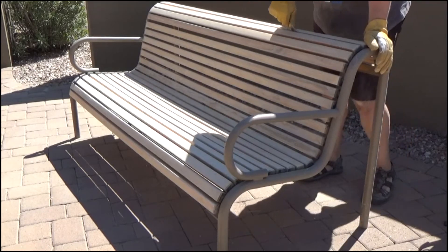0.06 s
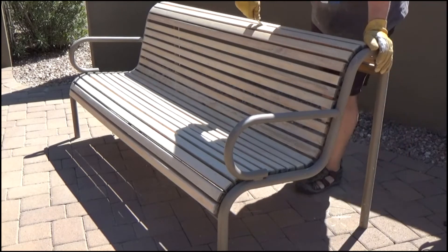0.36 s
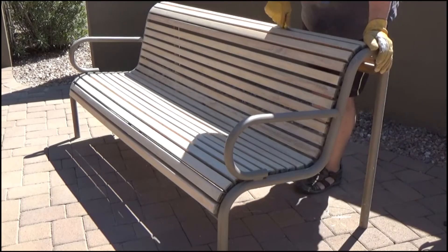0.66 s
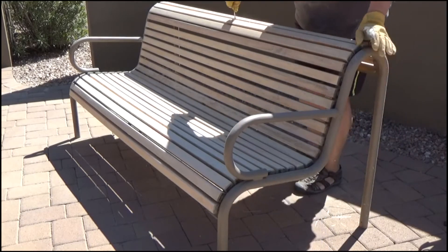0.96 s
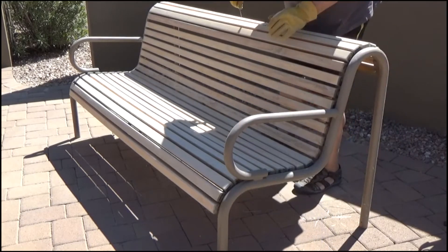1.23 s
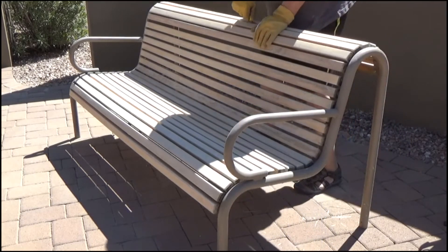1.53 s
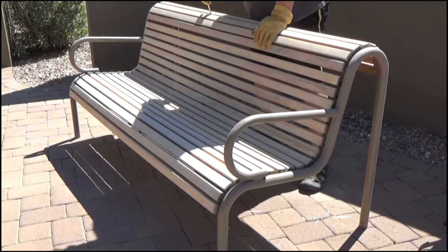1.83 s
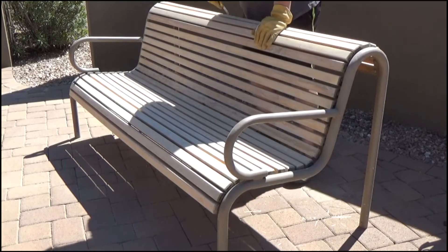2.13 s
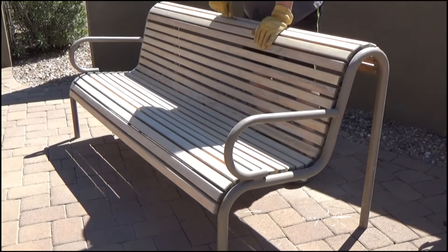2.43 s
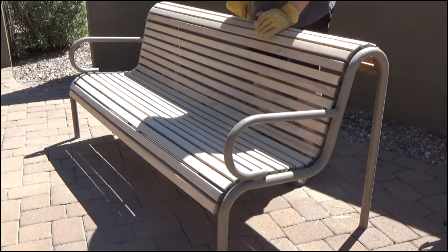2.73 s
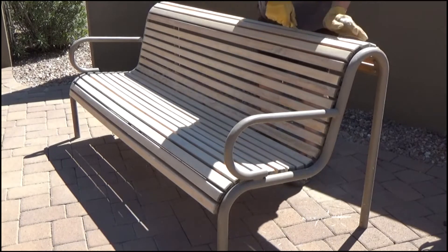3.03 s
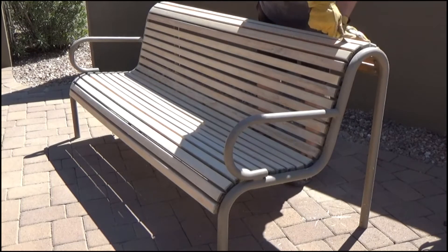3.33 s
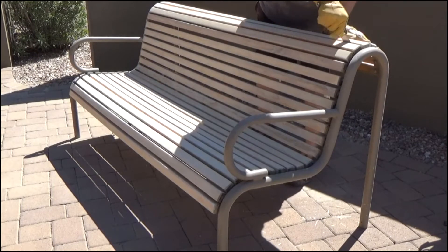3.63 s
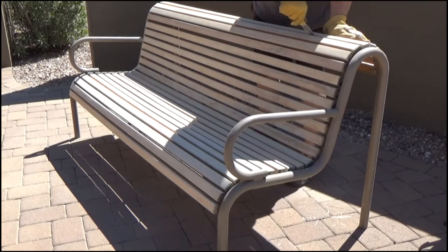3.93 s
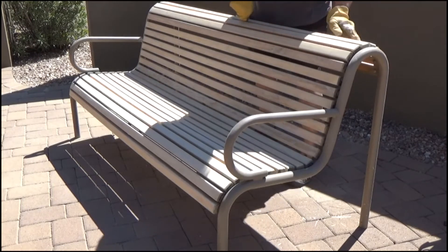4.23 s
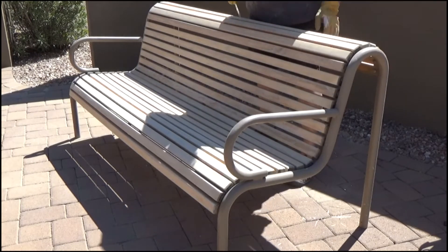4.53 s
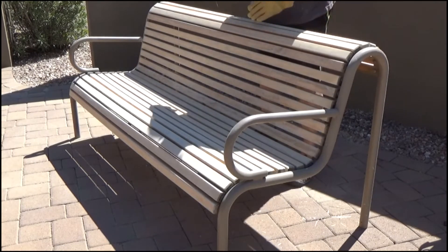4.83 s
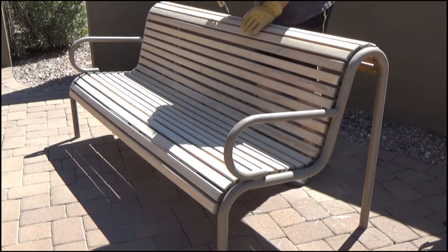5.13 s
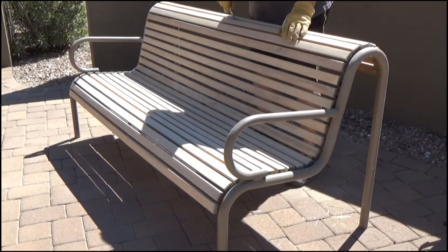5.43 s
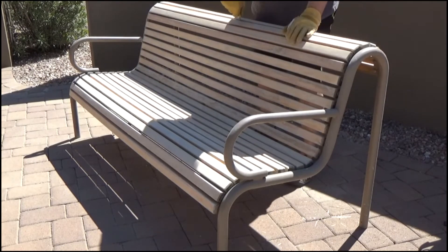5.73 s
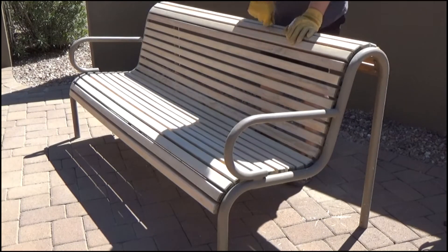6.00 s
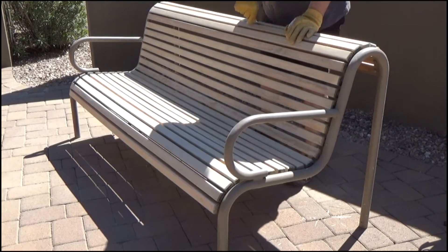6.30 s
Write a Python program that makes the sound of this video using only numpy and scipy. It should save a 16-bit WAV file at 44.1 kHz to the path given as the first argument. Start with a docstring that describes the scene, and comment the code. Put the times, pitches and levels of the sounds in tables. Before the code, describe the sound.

Steel scrapes old finish from a wooden bench in irregular strokes, knocking against the slats and occasionally ringing in quiet outdoor air.

```python
"""A walled patio, the microphone a few steps from a wooden bench. A steel scraper is pushed and pulled
along the gaps between the slats. Its edge rasps through old finish, squeaks on the slats' resonances,
knocks into the wood at the ends of strokes, rings when lifted clear and once clinks under pressure.
The bench takes a few dull bumps. Paving and wall throw the work back.
Behind it: quiet outdoor air, a mains hum and a faint, far trill."""
import sys
import numpy as np
from scipy import signal
from scipy.fft import rfft, irfft
from scipy.io import wavfile
from scipy.ndimage import map_coordinates

SR = 44100
rng = np.random.default_rng(int(sys.argv[2]) if len(sys.argv) > 2 else 0)


def to_wav(sig):
    """Store sig (one row per channel, or 1-D mono) as 16-bit WAV at the path in sys.argv[1].

    Samples outside -1..1 are clipped; the rate is SR.
    """
    pcm = np.clip(np.atleast_2d(sig), -1, 1) * 32767
    pcm = np.round(pcm).astype(np.int16)
    wavfile.write(sys.argv[1], SR, pcm.T)  # frames by channels


N = 284886
TIME = np.arange(N) / SR


def from_db(db):
    """Decibels to gain."""
    return 10 ** (np.asarray(db) / 20)


def rms_one(x):
    """Scale to rms 1."""
    return x / np.sqrt(np.mean(x ** 2) + 1e-20)


def dying(age, t60):
    """Gain that falls 60 dB in t60 seconds."""
    return from_db(-60 * age / t60)


def at_hz(spectrum, hz):
    """Read a spectrum's level in dB on a log-frequency axis."""
    f, db = np.transpose(spectrum)
    return np.interp(np.log(hz + 1e-9), np.log(f), db)


def drift(rate):
    """Random wander of spread 1, heading for a new value rate times a second."""
    knots = rng.standard_normal(N // 16)
    return np.interp(TIME * rate, np.arange(len(knots)), knots) * np.sqrt(3 / 2)


def butter(x, order, hz, kind):
    """Butterworth low-, band- or high-pass."""
    return signal.sosfilt(signal.butter(order, hz, kind, fs=SR, output="sos"), x)


def three_bands(x):
    """Split into wood body, rasp and edge hiss."""
    return [butter(x, 3, 1700, "low"), butter(x, 3, [1700, 6500], "band"), butter(x, 3, 6500, "high")]


def resonate(x, hz, width_hz):
    """One resonance with gain 1 at its peak."""
    r = np.exp(-np.pi * width_hz / SR)
    feedback = [1, -2 * r * np.cos(2 * np.pi * hz / SR), r * r]
    return signal.lfilter(np.array([1, 0, -1]) * (1 - r * r) / 2, feedback, x + 1e-18)


def coloured(x, spectrum, size=4096):
    """Causal (minimum-phase) filter with the given spectrum; white noise keeps its power."""
    gain = rms_one(from_db(at_hz(spectrum, np.arange(size // 2 + 1) * SR / size)))
    cepstrum = irfft(np.log(gain))
    cepstrum[1:size // 2] *= 2
    cepstrum[size // 2 + 1:] = 0
    return signal.fftconvolve(x, irfft(np.exp(rfft(cepstrum))))[:len(x)]


def widened(side, width):
    """Bring a stereo side signal to the given level at each frequency."""
    gain = from_db(at_hz(width, np.linspace(0, SR / 2, SR // 2)))
    return coloured(side, width) * np.sqrt(np.mean(gain ** 2))


# Spectrum of the open air around the microphone: f/Hz, level/dB
AIR_SPECTRUM = [(12, -52), (20, -6), (65, 4.5), (607, -1), (873, -2), (1610, -11.5), (2670, -10.5),
                (3160, -12), (3440, -11), (4060, -16), (7950, -15.5), (14700, -24), (16000, -17)]
# Its stereo width: f/Hz, side re mid/dB
AIR_SIDE = [(60, -30), (150, -15), (380, -8), (950, -3), (2380, -3), (5980, -6.5), (15000, -24)]
def outdoor_air(level_db=-55.5):
    """Steady, quiet air: central in the bass, wide in the middle range."""
    mid, side = [coloured(rng.standard_normal(N), AIR_SPECTRUM) for _ in range(2)]
    return from_db(level_db) * (mid + widened(side, AIR_SIDE) * [[1], [-1]])


# Harmonics of the hum in the background: f/Hz, rms level/dB
HUM_PARTIALS = [(60, -65), (120, -74), (180, -76)]
def mains_hum():
    """The mains hums on three low, steady tones."""
    return sum(from_db(db) * np.sqrt(2) * np.sin(2 * np.pi * hz * TIME) for hz, db in HUM_PARTIALS)


def far_trill(level_db=-70.5, hz=3450, pulses_per_s=30, uneven_db=3):
    """Far from the microphone: short pulses of one tone, uneven in strength."""
    pulses = np.sin(np.pi * pulses_per_s * TIME) ** 20 * from_db(uneven_db * drift(pulses_per_s))
    return from_db(level_db) * rms_one(pulses * np.sin(2 * np.pi * hz * TIME))


# Stereo width of the patio's echoes at the microphone: f/Hz, side re direct/dB
ECHO_SIDE = [(40, -27), (120, -43), (300, -17), (1000, -13.5), (2500, -15.5), (5000, -9.5), (8000, -21),
             (14000, -55)]
def patio(direct, echo_db=-8.0, early_t60=0.012, tail_db=-8.0, tail_t60=0.27):
    """Paving and wall answer at once; a thin scattered tail follows. The echoes carry the width."""
    age = TIME[:SR // 2]
    decay = rms_one(dying(age, early_t60)) + from_db(tail_db) * rms_one(dying(age, tail_t60))
    decay *= age > .002   # the first echo arrives after 2 ms
    mid, side = [rms_one(rng.standard_normal(len(age)) * decay) / np.sqrt(len(age)) for _ in range(2)]
    mid_echo = from_db(echo_db) * signal.fftconvolve(direct, mid)[:N]
    side_echo = signal.fftconvolve(direct, widened(side, ECHO_SIDE))[:N]
    return direct + mid_echo + side_echo * [[1], [-1]]


# Low modes of the whole bench: f/Hz, level/dB, t60/s
BENCH_MODES = [(155, -19.5, 0.58), (297, -29, 0.16), (349, -13, 0.15), (426, 0, 0.076), (688, 3.5, 0.11),
               (910, -29, 0.032), (1084, 5.5, 0.027), (1310, -41, 0.061), (1461, 5.5, 0.043),
               (1930, -48, .05)]
# Dull blows on the bench: t/s, level/dB, upper cut-off/Hz, lower cut-off/Hz
BENCH_BLOWS = [(.692, -24, 1000, 120), (.729, -34, 960, 450), (0.944, -32, 600, 200),
               (1.471, -27.5, 406, 190), (3.363, -24.5, 1200, 730)]
def bench_bumps(thud_db=0.9, thud_s=0.0068, rebound_gain=0.16, rebound_s=0.05):
    """Soft blows thud and set the low modes of the bench ringing."""
    out, age = np.zeros(N + SR), TIME[:SR // 2]
    thud_decay = np.exp(-age / thud_s) + rebound_gain * np.exp(-age / rebound_s)
    for t, db, high_hz, low_hz in BENCH_BLOWS:
        modes = sum(from_db(level) * dying(age, t60) * np.sin(2 * np.pi * hz * age) * rng.choice([-1, 1])
                    for hz, level, t60 in BENCH_MODES)
        thud = from_db(thud_db) * rng.standard_normal(len(age)) * thud_decay
        start = round(t * SR)
        out[start:start + len(age)] += from_db(db) * butter(.5 * modes + 3 * thud, 2, [low_hz, high_hz], "band")
    return out[:N]


# Modes of the steel blade, the longest ring first: f/Hz, level/dB, t60/s
BLADE_MODES = [(5218, 0, 1.15), (2660, -6, .32), (3808, -2.5, .38), (6722, 2, .36), (8188, -6, .19),
               (10400, -8, .24), (12730, -18, .2)]
# The blade rings, or clinks briefly while pressed on the wood:
# t/s, level/dB, t when damped/s, gain of all modes but the first/dB
RINGS_AND_CLINKS = [(1.03, -31, 1.068, -15), (1.232, -30.5, 1.318, 2), (1.975, -40, 2.265, -15),
                    (3.307, -43, 3.32, 14), (4.507, -44, 4.95, -2)]
def blade_rings(dips_per_s=15.5):
    """The blade rings until wood damps it; as the hand swings it, each mode's lobes sweep past."""
    out = np.zeros(N)
    for t, db, until, others_db in RINGS_AND_CLINKS:
        span = slice(round(t * SR), round((until + .05) * SR))
        age = TIME[span] - t
        attack = 1 - np.exp(-age / .001)
        damping = np.exp(-np.maximum(TIME[span] - until, 0) / .006)
        for k, (hz, level, t60) in enumerate(BLADE_MODES):
            lobes = .2 + .8 * np.abs(np.cos(np.pi * dips_per_s * rng.uniform(.8, 1.2) * age))
            mode = dying(age, t60) * np.sin(2 * np.pi * hz * age)
            out[span] += from_db(db + level + others_db * (k > 0)) * attack * damping * lobes * mode
    return out


# The edge catches and sings: t/s, f/Hz, level/dB
CATCHES = [(.129, 2100, -35.5), (.172, 3530, -33), (.155, 6320, -34), (.166, 8640, -27), (.177, 945, -39),
           (0.859, 732, -42), (.895, 751, -35), (.903, 1323, -32.5), (.912, 9730, -26.5), (.937, 7760, -29),
           (1.705, 7900, -33), (1.71, 5700, -28.5), (3.779, 1253, -34), (3.8, 595, -41.5),
           (3.858, 1266, -28.5), (3.99, 2035, -30.5), (4.004, 6780, -24), (4.072, 2630, -31),
           (4.17, 592, -44.5), (6.263, 8430, -29), (6.35, 690, -45), (6.37, 874, -40)]
def squeaks(width_share=0.068, level_db=0.5, half_length_s=0.015):
    """Friction feeds one narrow resonance for a few hundredths of a second."""
    out = np.zeros(N)
    for t, hz, db in CATCHES:
        width_hz = width_share * hz
        tone = rms_one(resonate(resonate(rng.standard_normal(N), hz, width_hz), hz, width_hz))
        swell = np.exp(-.5 * ((TIME - t) / half_length_s) ** 2)
        out += from_db(db + level_db) * tone * swell
    return out


# Steel strikes a slat: t/s, level/dB, wood body re mid band/dB, edge hiss re mid band/dB, 20 dB decay/s
STRIKES = [(0.032, -29, 14, -4.5, 0.0087), (.737, -32.5, 7.5, -5, 0.042), (.958, -10.5, -14, 5.5, 0.0018),
           (0.9608, -11.5, -19, -22, 0.019), (1.225, -21, -15, 5, 0.017), (1.322, -41, -22, 8.5, 0.14),
           (1.471, -39, 20, -6, 0.015), (1.62, -12, -5, -8, 0.061), (1.668, -14.5, -2.5, -4, 0.039),
           (1.9533, -22.5, 9, 9, 0.0028), (1.984, -29, 7, 7, .005), (2.0523, -23.5, 8, 2, 0.0058),
           (2.3072, -40, -15, 14, 0.022), (2.333, -30.5, 5.5, -16, .03), (3.15, -31, -12, 0, .01),
           (3.188, -33.5, -7, -16, 0.033), (3.3056, -29, 0, 3.5, 0.039), (3.3622, -11.5, 3, -6, 0.0029),
           (3.364, -23, 10, -14.5, 0.039), (3.416, -35.5, 9.5, -10, 0.042), (3.507, -40, 14, -12, 0.015),
           (3.5526, -45.5, -1, 8, 0.0062), (3.629, -42, -21, 14, 0.0098), (3.9, -22.5, -7, 3, .03),
           (4.2958, -13, -4.5, -6.5, 0.047), (4.344, -20.5, -3, -11, 0.038), (4.9935, -45.5, -3, 1, 0.011),
           (5.348, -16.5, -1, -4, 0.02), (5.394, -35.5, 5, -21, 0.036), (5.704, -41.5, 0, 13, 0.014),
           (5.904, -34.5, 2, -7, 0.036), (6.1573, -40.5, 1, 4.5, 0.032), (6.4276, -10, -35, -13, 0.023)]
# Colour of a knock from a few steps away: f/Hz, level/dB
KNOCK_SPECTRUM = [(71, -31), (120, -27.5), (463, -22), (856, -10), (1830, -10), (2340, -3), (2640, -4.5),
                  (3450, -2), (6770, -8.5), (8840, -7), (10800, -16.5), (14400, -41), (16000, -84)]
def knocks(first_contact=4.3, level_db=-1.5, snap_db=-22.0, snap_hz=12500, snap_s=.012):
    """One hard contact, then the blade chatters in the gap; the edge adds a short bright snap."""
    force, snaps, age = np.zeros(N + SR), np.zeros(N + SR), TIME[:SR // 4]
    for t, db, body_db, hiss_db, decay_s in STRIKES:
        chatter = rng.standard_normal(len(age)) * from_db(-20 * age / decay_s)
        chatter[0] = first_contact
        low, mid, high = three_bands(chatter)
        span = slice(round(t * SR), round(t * SR) + len(age))
        force[span] += from_db(db + level_db) * (from_db(body_db) * low + mid + from_db(hiss_db) * high)
        snaps[span] += from_db(db + hiss_db + snap_db) * high * np.exp(-age / snap_s)
    return coloured(force[:N], KNOCK_SPECTRUM) + resonate(snaps[:N], snap_hz, width_hz=5000)


# Resonances of the slats under the edge: f/Hz, width before the blade's damping/Hz, level/dB
SLAT_MODES = [(690, 290, -26), (1355, 22, -4), (1673, 17, -13), (2680, 910, 9.5), (3516, 21, 0),
              (4400, 20, -36), (4640, 190, 8), (5110, 16, 12.5), (6000, 92, -20), (6220, 65, -30),
              (7900, 53, -48), (9000, 140, 9.5), (9750, 37, 11.5), (10510, 230, 10.5)]
def through_slats(force, ring_db=-7.0, wander_db=3, wander_rate=14, loss_share=.016):
    """Each slat resonance swells and fades as the contact travels; the pressing blade damps it."""
    rings = sum(from_db(db + wander_db * drift(wander_rate)) * resonate(force, hz, width + loss_share * hz)
                for hz, width, db in SLAT_MODES)
    return force + from_db(ring_db) * rings


def edge_colour(force, patchy_db=5.0, change_rate=28, spacing_hz=89.05, size=512):
    """Blade and wood pressed together have close, damped resonances that come and go along the gap."""
    frames = dict(fs=SR, nperseg=size, noverlap=size - size // 4)
    hz, t, cells = signal.stft(force, **frames)
    chance = rng.standard_normal((size, size))
    warped_hz = 4000 * np.log1p(hz / 4000)   # resonances lie wider apart in the treble
    grid = np.meshgrid(warped_hz / spacing_hz, t * change_rate, indexing="ij")
    ripple = np.clip(rms_one(map_coordinates(chance, grid, order=1, mode="wrap")), -2.2, 2.2)
    _, singing = signal.istft(cells * from_db(patchy_db * ripple), **frames)
    return rms_one(singing[:N])


# Pushes and pulls along the gaps: t at full speed/s, rasp level/dB, wood body re rasp/dB,
# edge hiss re rasp/dB, rise/s, hold/s, fall/s
SCRAPER_STROKES = [ (0.16, -30, -5.5, -0.5, 0.12, 0.052, 0.066), (0.329, -43, -1, -1, 0.12, 0.0086, 0.08),
                   (0.507, -39.5, -10.5, 8.5, 0.074, 0.0066, 0.036),
                   (0.634, -43, -5, 1.5, 0.089, 0.041, 0.076), (0.825, -31.5, -10.5, 1.5, 0.038, .02, 0.15),
                   (0.898, -25.5, -10.5, 2.5, 0.065, .05, 0.023),
                   (0.979, -29.5, -7, -6.5, 0.14, 0.04, 0.073), (1.222, -32.5, -5, -3, .11, 0.0072, 0.069),
                   (1.37, -46.5, 2.5, -5, 0.017, 0.023, 0.19), (1.551, -28, -6.5, -3.5, 0.11, 0.13, 0.14),
                   (1.688, -25.5, -7.5, 2.5, 0.044, .025, 0.044), (1.777, -28.5, -9, -3, 0.11, .18, 0.023),
                   (2.001, -33.5, -2, -1.5, .025, 0.0045, 0.035), (2.095, -52, 2, -7, 0.074, 0.036, 0.09),
                   (2.309, -41, -10, 1.5, 0.042, 0.012, 0.026), (2.336, -41.5, 0, -15, 0.025, 0.0084, .17),
                   (2.598, -43, -4.5, 5, 0.12, 0.047, 0.27), (2.755, -43, -1.5, -19, 0.3, 0.017, 0.14),
                   (2.920, -47, -8.5, 3, 0.34, 0.097, .2), (3.114, -47, -5.5, 7, 0.19, 0.13, 0.23),
                   (3.738, -32.5, -4, -3.5, .14, 0.091, 0.13), (3.860, -30.5, -1, -8, .15, 0.1, 0.19),
                   (4.000, -23, -15, -0.5, 0.072, .01, .1), (4.082, -31.5, -3.5, -9, .08, 0.011, 0.16),
                   (4.159, -29.5, -8.5, -1.5, 0.093, 0.032, 0.076),
                   (4.407, -45, -6.5, -14, 0.06, .01, 0.33), (4.504, -46.5, -1.5, 6, .04, 0.0043, 0.035),
                   (5.040, -58, -10, 3, .04, .01, 0.045), (5.275, -54, 2.5, -17, 0.016, 0.009, 0.074),
                   (5.335, -48.5, -7, 0, 0.056, 0.012, 0.053), (5.505, -54.5, -0.5, -8, 0.21, .02, 0.081),
                   (5.56, -55.5, -25, -1, .04, 0.086, 0.087), (5.815, -40, -4, 3, 0.3, .03, 0.22),
                   (5.905, -38, -7, 4, .04, 0.032, 0.068), (5.956, -33, -6.5, -3.5, 0.017, 0.042, 0.06),
                   (6.245, -30.5, -7.5, -0.5, 0.084, .025, 0.13), (6.345, -25.5, -7, -6.5, 0.13, 0.05, .15)]
def stroke_levels(ramp_db=20):
    """Each stroke speeds up, holds and slows, evenly in dB. Gives body, rasp and hiss levels in dB."""
    power = np.zeros((3, N))
    for t, db, body_db, hiss_db, rise, hold, fall in SCRAPER_STROKES:
        # rise or fall times away from full speed; each costs ramp_db
        slack = np.maximum(t - TIME, 0) / rise + np.maximum(TIME - t - hold, 0) / fall
        moving = slack < 3
        full_db = db + np.array([[body_db], [0], [hiss_db]])
        power[:, moving] += from_db(full_db - ramp_db * slack[moving]) ** 2
    return 10 * np.log10(power + 1e-12)


# Old finish under the edge: t/s, chips re smooth rasp/dB, bright flaking/dB
FINISH = [(0, -9, 4), (1.0, -47, -5), (1.7, -3.5, 1), (1.8, 1.5, -19), (2.0, 11, -20), (2.3, -11, 16),
          (2.65, 0.5, 11), (3.1, -16, 5), (3.8, -5.5, -7), (5.3, -18, 4), (5.6, 12, 14), (6.0, -10, 12),
          (6.25, -8, -2)]
# Colour of the rasp before its bass cut: f/Hz, level/dB
RASP_SPECTRUM = [(71, -48), (120, 6), (445, -11.5), (643, -3.5), (805, -2.5), (1260, -0.5), (1370, -3),
                 (2380, 0), (3820, 3.5), (4980, -4), (7050, -4.5), (8660, -6), (11500, -18.5), (15000, -26),
                 (16000, -23)]
def scrape(chips_per_s=700, chip_spread_db=1.0, judder_db=1.5, unsteady_db=1.0,
           crackle_hz=12000, crackle_db=-23.0):
    """Dense fibre contacts and separate chips of finish shake the blade and the slats."""
    body_db, rasp_db, hiss_db = stroke_levels() + unsteady_db * drift(rate=40)
    t, *columns = np.transpose(FINISH)
    grit_db, flaking_db = [np.interp(TIME, t, column) for column in columns]
    fibres = rms_one(rng.standard_normal(N) * from_db(judder_db * drift(rate=350)))
    sizes = from_db(chip_spread_db * np.minimum(rng.exponential(1, N), 3)) * rng.choice([-1, 1], N)
    chips = rms_one(sizes * (rng.random(N) < chips_per_s / SR))
    # a gliding edge sings, a chipping one sounds dry
    grit = from_db(grit_db)
    force = (edge_colour(fibres) + grit * chips) / np.sqrt(1 + grit ** 2)
    wood = coloured(through_slats(force), RASP_SPECTRUM)
    bands = three_bands(butter(wood, 2, 430, "high"))   # the rasp is thin below 430 Hz
    rasp = sum(from_db(db) * rms_one(band) for db, band in zip((body_db, rasp_db, hiss_db), bands))
    # flaking finish also crackles straight into the air, very bright
    crackle = rms_one(resonate(resonate(chips + .5 * fibres, crackle_hz, 6000), crackle_hz, 6000))
    return rasp + from_db(hiss_db + flaking_db + crackle_db) * crackle


def scene():
    """The bench from a few steps away; the blade rings straight across to the microphone."""
    work = scrape() + squeaks() + knocks() + bench_bumps()
    return patio(work) + blade_rings() + outdoor_air() + mains_hum() + far_trill()


def record(dry, cutoff_hz=15900):
    """The top of the microphone's signal is cut steeply."""
    return signal.sosfilt(signal.ellip(10, .1, 80, cutoff_hz, fs=SR, output="sos"), dry)


dry = scene()
out = record(dry)
to_wav(out)
```